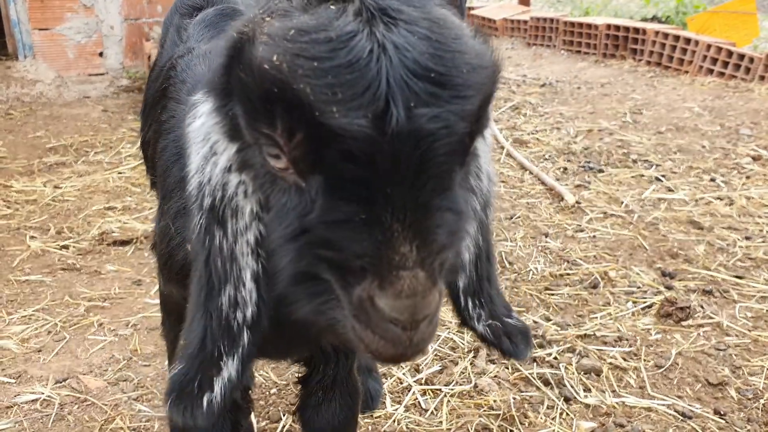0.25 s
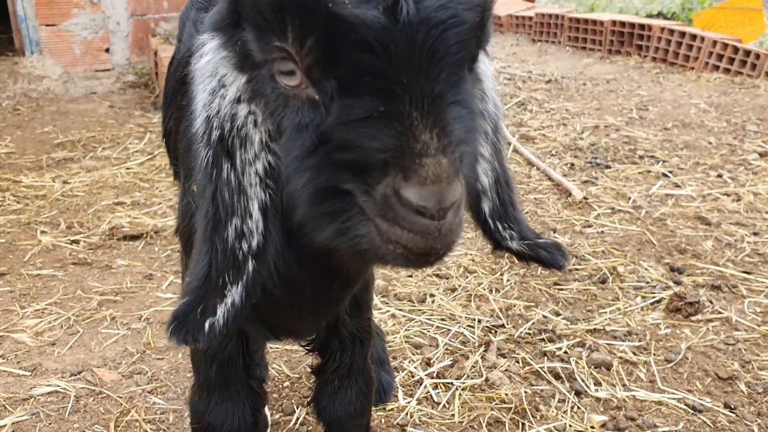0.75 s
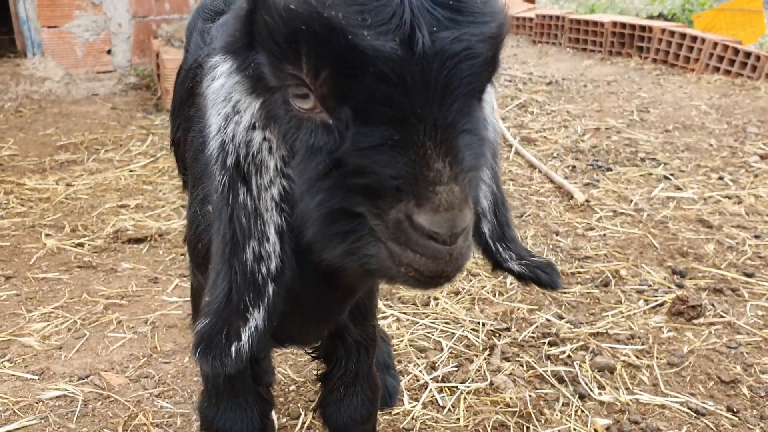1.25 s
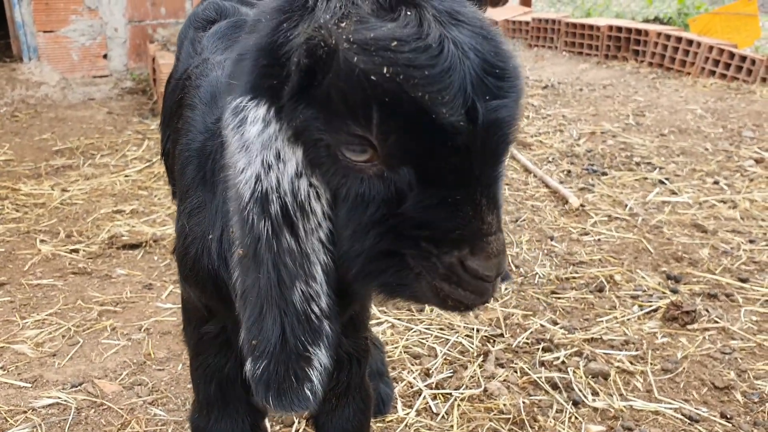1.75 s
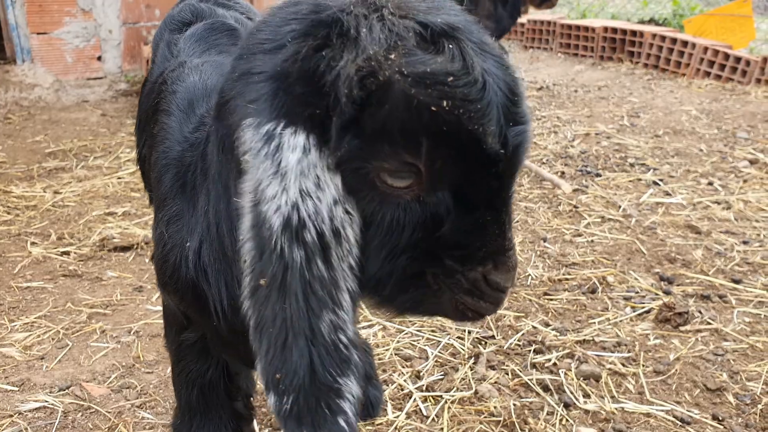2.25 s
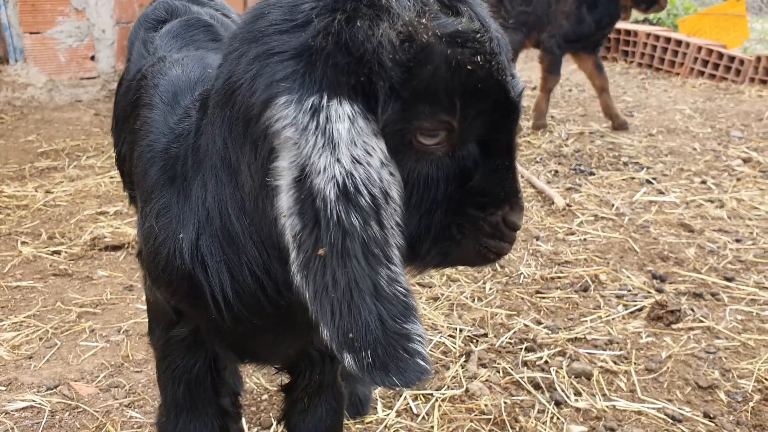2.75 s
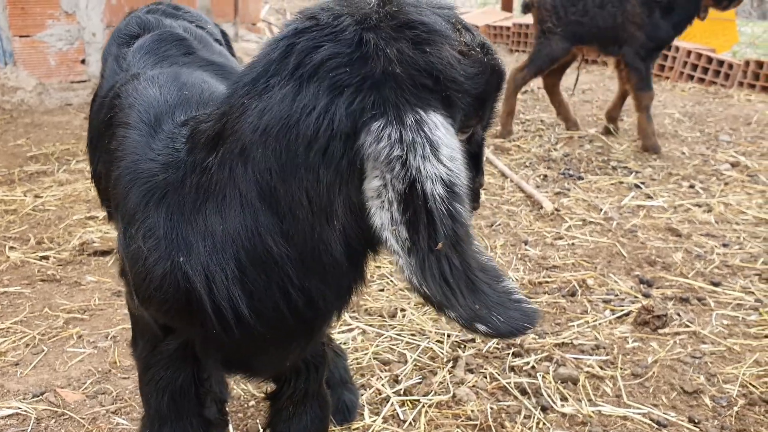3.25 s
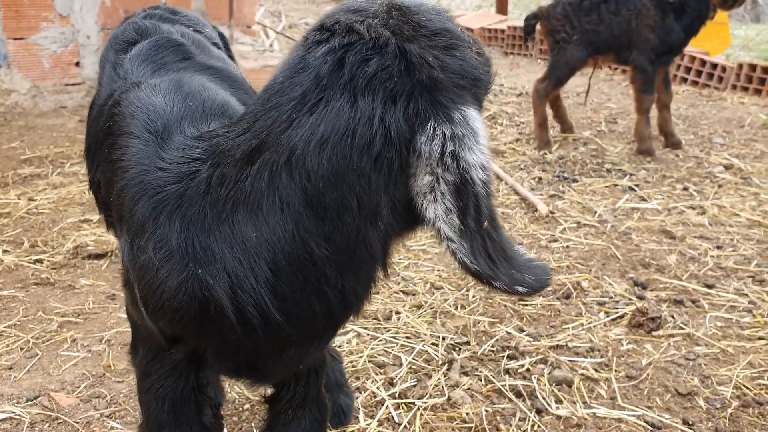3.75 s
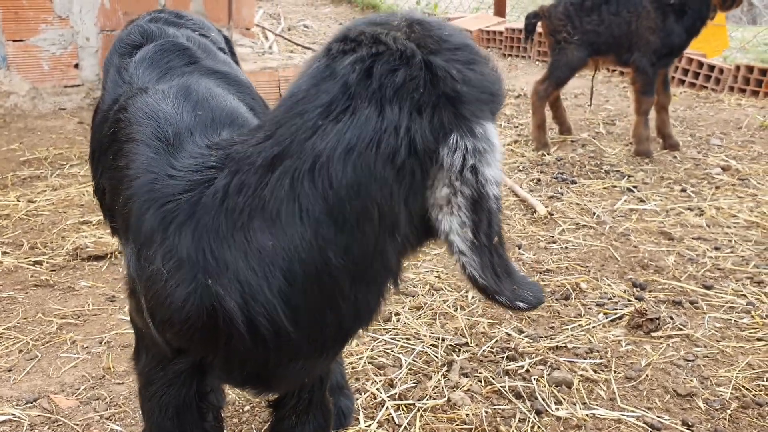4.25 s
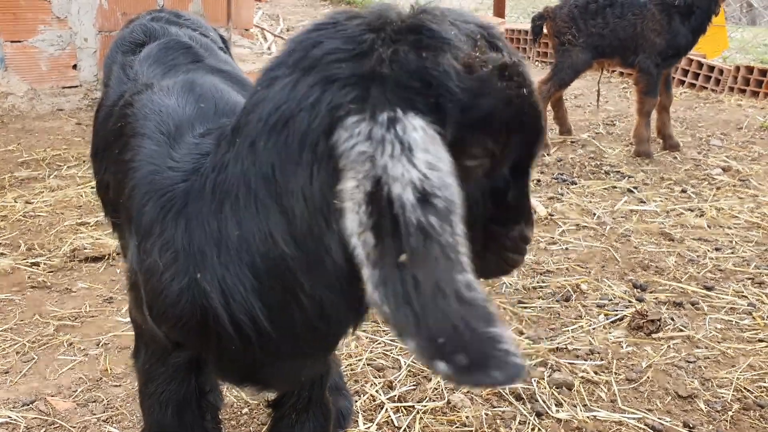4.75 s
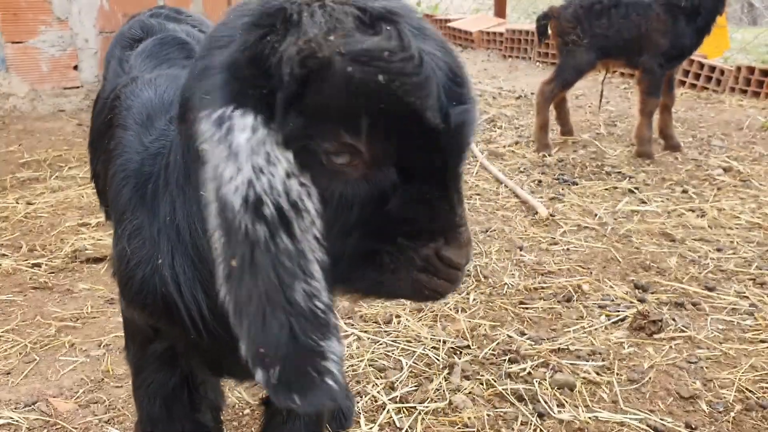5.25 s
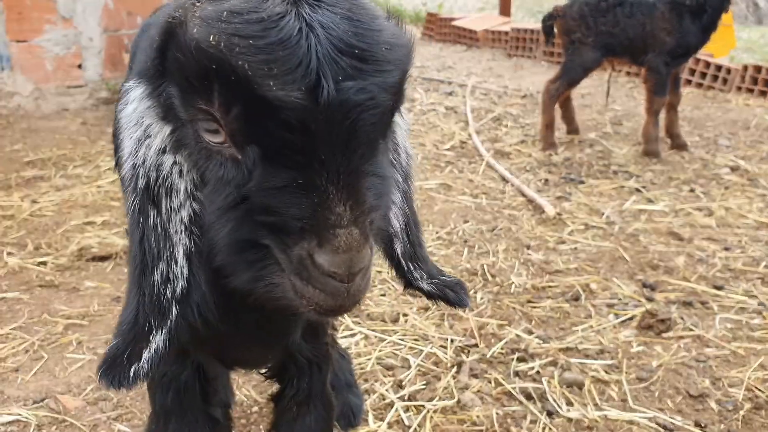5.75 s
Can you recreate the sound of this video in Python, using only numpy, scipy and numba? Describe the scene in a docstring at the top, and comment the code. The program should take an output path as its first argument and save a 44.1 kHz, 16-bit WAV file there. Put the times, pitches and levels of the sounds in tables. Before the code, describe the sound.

Close nasal bleats from a goat kid, two hoof knocks on grit, rustling straw and low rumbling wind gusts in a quiet open yard.

```python
"""An open straw pen: close to a phone, a goat kid bleats three times, thin, quavering, mouth nearly shut.
The voice is a pulsed source filtered by throat and nose; two voiceless puffs end the second bleat.
Hooves knock, scuff and snap straw as decaying modes and noise bursts. Wind buffets two microphone ports
as coloured turbulence, tearing gusts and single thumping eddies.
A bird whistles faintly in gliding tones over a slowly settling farmyard hush of shaped noise."""
import sys
import numpy as np
from scipy import signal
from scipy.fft import rfft, irfft
from scipy.io import wavfile
from scipy.ndimage import uniform_filter1d
from numba import njit

SR = 44100
rng = np.random.default_rng(int(sys.argv[2]) if len(sys.argv) > 2 else 0)


def wav_out(sig):
    """Save sig, one row per channel (or a flat mono array), as 16-bit PCM at SR to the path in sys.argv[1]."""
    wavfile.write(sys.argv[1], SR, np.round(np.clip(np.atleast_2d(sig).T, -1, 1) * 32767).astype(np.int16))


N = 264864
T = np.arange(N) / SR  # time [s]

# bleats beneath their throbs: (time [s], pitch [Hz], level [dB], mouth opening [dB])
BLEAT_1 = [(.1, 340, -77, -12), (.15, 351, -58, -4), (.2, 372.4, -61.5, -3), (.25, 387, -58, -3.5),
           (.31, 376.7, -59, -1), (.345, 389.7, -58.5, 3), (.45, 385, -61.5, 4.5), (.49, 403.3, -59, 3.5),
           (.56, 410.5, -59, 3.5), (.615, 410, -55.5, 1), (.66, 410.2, -58, 2.5), (.77, 405.7, -56.5, 0),
           (0.801, 365, -60, -7), (.84, 340, -67, -1), (.885, 337, -85, -7.5)]
BLEAT_2 = [(3.068, 337.6, -81, 4), (3.11, 351.6, -65.5, 0), (3.161, 359.2, -68.5, -3),
           (3.205, 382.6, -67.5, -1.5), (3.245, 386, -60.5, -9), (3.301, 381.2, -67.5, -1.5),
           (3.335, 379.8, -63, -6.5), (3.357, 354, -67, -2), (3.389, 367, -66, -4),
           (3.431, 370.7, -60, -5.5), (3.49, 382.5, -59.5, -2.5), (3.6, 348, -83, -11)]
BLEAT_3 = [(5.575, 329, -74, -4), (5.605, 327.2, -58, 1), (5.63, 317.5, -58.5, -2.5),
           (5.655, 303.2, -63, -5), (5.684, 359.7, -71, 2), (5.725, 385, -61.5, 5),
           (5.775, 396.6, -55, -2.5), (5.82, 382, -55, -4.5), (5.871, 377.8, -55, -5.5),
           (5.914, 387, -56.5, 3), (5.955, 396, -56, -2.5), (6.01, 389, -55.5, -5)]
# throat and nose spectrum of each bleat: (frequency [Hz], gain [dB])
THROAT_1 = [(250, -14), (410, 8.5), (820, -12), (1230, 0.5), (1620, -3.5), (2060, -11), (2450, -8),
            (2880, -2), (3300, -6), (3700, -9), (4150, -5), (4550, -7.5), (5050, 1), (5750, -8.5),
            (6500, -11.5), (7500, -12.5), (8500, 0), (9400, -13.5), (10200, -58)]
THROAT_2 = [(250, 21), (400, 12), (820, -7), (1260, 2.5), (1680, 5.5), (2100, -2.5), (2550, 4.5),
            (3200, -2), (3800, 3.5), (4200, 3), (4900, -6), (5900, -2.5), (7350, -4.5), (9100, -2),
            (10300, -27)]
THROAT_3 = [(250, 4), (410, 9.5), (820, -10.5), (1250, 0.5), (1650, -0.5), (2000, -11), (2350, -7),
            (3200, -9), (3800, 5.5), (4200, -3), (4600, -13), (5200, -3.5), (5900, -3), (7100, -15.5),
            (8100, -9.5), (9400, -17), (10200, -59)]
# highest resonance of each bleat, mouth shut, between throbs: (frequency [Hz], boost [dB])
NOSES = [(7020, 13), (7580, 6.5), (7196, 14)]
# level rise of each bleat under a push of full strength: (rise [dB])
QUAVERS = [5.5, 14.5, 3]


def kid():
    """Source-filter principle: three bleats, each with its own pitch contour and vocal-tract resonances."""
    contours = (BLEAT_1, BLEAT_2, BLEAT_3)
    throats = (THROAT_1, THROAT_2, THROAT_3)
    return sum(bleat(*call) for call in zip(contours, throats, NOSES, QUAVERS))


# pushes of the belly that make the quaver: (time [s], strength [0-1])
THROBS = [(0.159, 0.29), (.275, 0.47), (0.376, 0.58), (.473, 0.84), (0.576, 0.19), (0.62, 0.15),
          (0.711, 0.13), (0.766, 0.16), (3.114, 0.78), (3.217, 0.94), (3.306, 0.95), (3.39, .5),
          (5.604, 0.6), (5.73, 0.98), (5.821, 1), (5.913, 0.98), (6.0, 0.79)]
THROB_HALF_S, THROB_RISE_HZ = .023, 42.15  # half length of a push; pitch rise at full strength
# the voice is clearest when pressed and grows hoarse as it weakens
PRESSED_DB, CLEAR_ROUGH, ROUGH_PER_DB = -56, .3, .065
PORT_LAG_S = .00018  # the voice reaches the left port later
GROUND_DB = -5  # ground reflection, against the straight path


def bleat(contour, throat, nose, quaver_db, nose_width_hz=1000, widen_hz=1100, drop_hz=700,
          lead_s=0.0062, throat_pan_db=-1.0, nose_pan_db=6, wall_db=-15):
    """Modulated resonance: a throb lifts pitch and level, and lowers and broadens the high resonance."""
    hz, db, mouth_db = curves(contour)
    start, end = contour[0][0], contour[-1][0]
    push = sum(strength * bell(s, THROB_HALF_S) for s, strength in THROBS)
    hz = hz + THROB_RISE_HZ * push
    db = db + quaver_db * push
    rough = np.clip(CLEAR_ROUGH + ROUGH_PER_DB * np.maximum(PRESSED_DB - db, 0), 0, 1)
    voice = colour(larynx(hz, rough), throat) * undb(db) * (T > start) * (T < end)

    direct = np.array([np.interp(T - PORT_LAG_S, T, voice), voice])
    # the head hangs low, so the ground returns much of the voice
    ground = undb(GROUND_DB) * scatter(voice, decay_s=0.013)
    walls = undb(wall_db) * scatter(voice, decay_s=0.034)
    buzz = direct + ground + walls

    # the throat widens just ahead of the push, more for a strong one
    opening = np.interp(T + lead_s, T, push) * quaver_db / 10
    nose_hz, nose_db = nose
    centre = np.clip(nose_hz - drop_hz * opening, 20, SR / 3)
    width = nose_width_hz + widen_hz * opening
    whine = np.array([resonance(resonance(port, centre, width), centre, width) for port in buzz])
    mouth_sound = pan(throat_pan_db) * undb(mouth_db) * buzz
    nose_sound = pan(nose_pan_db) * undb(nose_db) * whine
    return mouth_sound + nose_sound


def larynx(hz, rough):
    """Vocal-fold oscillation: harmonic pulses, uneven with roughness, and air that escapes once a cycle."""
    jitter = .003 * walk(80) + .016 * rough * walk(400)
    phase = 2 * np.pi * np.cumsum(hz * (1 + jitter)) / SR
    folds = unit(sum(np.cos(k * phase) for k in np.arange(1, 29)))
    air = unit(rng.standard_normal(N) * (1 + np.cos(phase)))
    shimmer_db = 4 * rough * walk(200) + 1.5 * walk(70)
    return (folds + .8 * rough * air) * undb(shimmer_db) / np.sqrt(1 + rough ** 2 / 2)


# voiceless puffs ending the second bleat:
# (time [s], rise [s], decay [s], level [dB], left minus right [dB])
PUFFS = [(3.455, 0.027, 0.05, -50, -3), (3.553, 0.014, 0.046, -58, -3)]
# spectrum of the puffs: (frequency [Hz], level [dB])
PUFF_COLOUR = [(400, -28), (850, 6), (1050, 2.5), (1250, -10), (1800, 8.5), (2300, 4.5), (2700, -2),
               (3050, 4), (3420, 8), (3700, -3), (4200, -4), (4520, -5), (5100, -13), (9000, -14),
               (10500, -36)]


def snort():
    """Turbulent jet noise: air forced through the nose without voice."""
    return bursts(PUFFS, PUFF_COLOUR, grain_db=1.0)


# hooves knocking on grit: (time [s], level [dB], pitch [ratio], left minus right [dB])
KNOCKS = [(2.1769, -37, 0.966, -3), (2.583, -46, 1.12, -14)]
# modes of a knock at pitch ratio 1: (frequency [Hz], level [dB], 60 dB decay [s])
KNOCK_MODES = [(1140, -13, 0.014), (1310, -5, 0.016), (1820, -8, 0.014), (2765, -3, 0.021),
               (2980, -9, 0.018), (3500, -24, 0.0071), (7100, -17.5, 0.0055)]
# grit cracking under a hoof: (time [s], level [dB], pitch [ratio], left minus right [dB])
CRACKS = [(2.1665, -49, 1.8, 1), (2.1915, -54, 0.86, -5), (5.2454, -54, 1.3, -3), (5.2494, -44.5, 1.05, 1),
          (5.2525, -44.5, 0.94, -1), (5.2577, -51, 0.92, -4)]
# modes of a crack at pitch ratio 1: (frequency [Hz], level [dB], 60 dB decay [s])
CRACK_MODES = [(620, -11, .008), (2080, -4, 0.0062), (3020, 1.5, 0.005), (3870, -9, 0.0052),
               (5000, -9, .003)]
# hooves scuffing the strawy ground:
# (time [s], rise [s], decay [s], level [dB], left minus right [dB])
SCUFFS = [(.365, 0.0058, 0.017, -62, 4), (2.15, .003, 0.038, -60, -4), (2.495, .004, 0.032, -66.5, -4),
          (2.632, 0.002, 0.0061, -58, -3), (5.88, 0.0093, .01, -66, 2), (5.915, 0.017, .022, -62.5, 1)]
# spectrum of the scuffs: (frequency [Hz], level [dB])
SCUFF_COLOUR = [(500, -24), (950, -3.5), (1220, 9), (1520, -6.5), (1790, 0.5), (1980, -24), (2220, 14),
                (2420, -3), (2680, 6.5), (3000, 0), (3500, 8), (4300, -5), (7500, -15), (10000, -50)]
# dry stalks snapping: (time [s], rise [s], decay [s], level [dB], left minus right [dB])
STALKS = [(.798, 0.00093, 0.006, -58.5, -22), (2.521, 0.0096, 0.02, -59.5, -.5),
          (3.513, 0.0019, .0084, -60, -3)]
# spectrum of the snaps: (frequency [Hz], level [dB])
STALK_COLOUR = [(1000, -29), (3000, 10), (7000, 2), (9500, 0), (15000, -4)]


def hooves():
    """Impact and friction: hard contacts excite modes, crushed straw makes bursts of noise."""
    knocks = clicks(KNOCKS, KNOCK_MODES, contact_s=.00022)
    cracks = clicks(CRACKS, CRACK_MODES, contact_s=0.00017)
    hard = knocks + cracks
    reflected = undb(-2) * scatter(hard.mean(axis=0), decay_s=0.013)
    scuffs = bursts(SCUFFS, SCUFF_COLOUR, grain_db=1.5)
    snaps = bursts(STALKS, STALK_COLOUR, grain_db=-1.0)
    return hard + reflected + scuffs + snaps


def clicks(table, modes, contact_s):
    """Modal synthesis: each hard contact is a sum of briefly ringing, exponentially damped sines."""
    out, t = np.zeros((2, N)), T[:SR // 20]
    onset = 1 - np.exp(-(t / contact_s) ** 2)
    for s, db, pitch, pan_db in table:
        ring = sum(undb(mode_db - 60 * t / t60) * np.sin(2 * np.pi * hz * pitch * t)
                   for hz, mode_db, t60 in modes)
        first = int(s * SR)
        out[:, first:first + len(t)] += undb(db) * pan(pan_db) * ring * onset
    return out


def bursts(table, points, grain_db):
    """Enveloped noise: quick swells of grainy noise that decay exponentially."""
    swell = 0
    for s, rise, decay, db, pan_db in table:
        envelope = np.where(T < s, bell(s, rise), np.exp(-np.abs(T - s) / decay))
        swell = swell + undb(db) * pan(pan_db) * envelope
    grains = unit(noise(points, likeness=0.034) * undb(grain_db * walk(900)))
    return swell * grains


# gusts on the ports: (arrival [s], rise [s], hold [s], level [dB],
# small eddies against large [dB], left minus right [dB])
GUSTS = [(0.104, 0.036, .015, -40, -14, 3), (0.46, 0.08, 0.025, -38.5, -12, 6),
         (0.6, 0.036, 0.2, -29.5, -15, -3), (0.843, 0.022, 0.36, -29, -9, -4),
         (1.22, 0.029, 0.18, -33, 3.5, 1.5), (1.535, 0.11, 0.087, -24, -12, -1),
         (1.632, 0.028, 0.44, -28, -10.5, -1), (2.098, 0.046, 0.43, -29.5, -14.5, -7),
         (2.655, 0.041, 0.24, -28.5, -7.5, -0.5), (3.8, 0.042, 0.018, -27, -18.5, -3.5),
         (4.192, 0.072, 0.055, -28, -16, 10.5), (4.297, 0.014, 0.039, -21.5, -14.5, 3.5),
         (4.436, 0.18, 0.079, -34, -20.5, 2), (4.92, 0.024, 0.27, -34, -19, 0.5),
         (5.122, 0.0088, 0.16, -26.5, -17.5, -7), (5.381, 0.018, 0.023, -30.5, 1.5, -7.5),
         (5.431, 0.051, 0.074, -28, -31, -3), (5.728, 0.03, 0.02, -30.5, -19, -1),
         (5.875, 0.0059, 0.0057, -37, -36, 28)]
# spectrum of the large eddies: (frequency [Hz], level [dB])
LARGE_EDDIES = [(12, -15.5), (26, -9), (54, 4.5), (80, 4.5), (191, -16.5), (400, -58.5), (520, -47),
                (880, -120)]
# spectrum of the small eddies: (frequency [Hz], level [dB])
SMALL_EDDIES = [(90, -4), (170, 13.5), (240, 8), (350, 1), (500, -22), (700, -23.5), (1200, -50.5),
                (2500, -62.5), (6000, -65.5)]
BREEZE_DB, BREEZE_SMALL_DB = -53, -58  # light breeze beneath the gusts: large and small eddies


def wind(flutter_db=4, buffets_per_s=10, buffet_db=3, sway_db=3.0):
    """Turbulence at two scales: large eddies rumble under each gust and small ones flutter on top."""
    large, small = undb(BREEZE_DB) ** 2, undb(BREEZE_SMALL_DB) ** 2
    for s, rise, hold, db, fine_db, side_db in GUSTS:
        power = (gust(s, rise, hold) * undb(db) * pan(side_db)) ** 2
        large = large + power
        small = small + power * undb(fine_db) ** 2
    rumble = eddies(LARGE_EDDIES, evenness=0.4, span_s=0.038, likeness=0.26) * np.sqrt(large)
    fine = eddies(SMALL_EDDIES, evenness=0.89, span_s=0.054, likeness=-0.15)
    flutter = unit(fine * undb(flutter_db * walk(70))) * np.sqrt(small)
    # the flow arrives in uneven buffets and swings from port to port
    shedding = 2 * np.pi * np.cumsum(buffets_per_s * (1 + 0.4232 * walk(13))) / SR
    buffets = unit(undb(buffet_db * np.sin(shedding)))
    return (rumble + flutter) * buffets * pan(sway_db * walk(18))


def gust(s, rise, hold, fall_s=0.032):
    """Exponential build-up and decay: a gust grows until time s, holds, and every one dies away alike."""
    return np.exp(-np.maximum(s - T, 0) / rise - np.maximum(T - s - hold, 0) / fall_s)


def eddies(points, evenness, span_s, likeness):
    """Turbulent pressure at each port: coloured noise, its strength partly evened out over span_s."""
    x = noise(points, likeness)
    strength = uniform_filter1d(x ** 2, max(int(span_s * SR), 2), axis=1) + 1e-6
    return unit(x / strength ** (np.clip(evenness, 0, 1) / 2))


# fast gusts tearing across the ports: (time [s], half length [s], rush [dB], crackle [dB])
TEARS = [(1.053, 0.0045, -48, -43), (1.099, .004, -42, -52), (1.119, 0.017, -46, -44.5),
         (1.156, 0.0061, -25, -39), (1.175, 0.02, -28, -39.5), (1.224, 0.0059, -24.5, -44),
         (1.242, 0.012, -24, -65), (1.279, 0.017, -36, -68), (1.316, 0.021, -36.5, -73),
         (1.343, 0.0087, -21, -39), (1.369, 0.01, -25, -38.5), (1.376, 0.0053, -28.5, -43),
         (1.393, 0.0077, -40.5, -58), (1.431, 0.0034, -36, -51.5), (1.551, 0.0083, -48, -54.5),
         (1.698, 0.0025, -32.5, -60), (1.897, .005, -46, -52), (2.63, 0.0042, -42, -65),
         (2.712, 0.0033, -53, -44.5), (2.852, 0.017, -42.5, -72), (5.267, 0.0053, -50, -55),
         (5.314, 0.0028, -43.5, -60), (5.361, 0.0034, -39.5, -67), (5.402, 0.0061, -38.5, -63)]
# spectrum of the rush: (frequency [Hz], level [dB])
TEAR_COLOUR = [(120, -9), (250, 6.5), (410, 6), (620, -3.5), (800, -25), (1200, -36), (2500, -57)]
# spectrum of the gritty crackle: (frequency [Hz], level [dB])
CRACKLE_COLOUR = [(480, 5.5), (720, 5.5), (1100, -1), (1500, -17.5), (2200, -28), (3500, -39.5),
                  (8000, -46.5)]


def tearing(grain_db=4):
    """Fine-scale turbulence: the fastest gusts reach the midrange, the sharpest with a gritty crackle."""
    rush = sum(bell(s, half) * undb(db) for s, half, db, _ in TEARS)
    grit = sum(bell(s, half) * undb(db) for s, half, _, db in TEARS)
    body = eddies(TEAR_COLOUR, evenness=0.92, span_s=0.0099, likeness=-0.53)
    fine = eddies(CRACKLE_COLOUR, evenness=1.0, span_s=0.021, likeness=-0.48)
    crackle = unit(fine * undb(grain_db * walk(600)))
    return rush * body + grit * crackle


# hardest single eddies, before a common gain:
# (time [s], relative level [dB], pitch [Hz], left minus right [dB])
THUMPS = [(0.831, -18, 82, 10), (0.85, -19, 206, 3), (0.955, -12.5, 79.6, -16), (1.031, -18.5, 70.4, 8),
          (1.065, -14, 89, -12), (1.124, -15, 69.4, -0.5), (1.153, -21.5, 533, -13), (1.179, -23, 577, 10),
          (1.18, -12, 128, 8), (1.245, -15.5, 192, 14), (1.306, -18.5, 86, -6.5), (1.366, -21, 480, 1),
          (1.379, -21, 496, 17), (1.435, -15, 98.5, 14), (1.511, -17, 78.5, 5), (1.546, -8.5, 84, -11),
          (1.575, -14, 69.4, -6), (1.624, -11, 140, -14), (1.765, -17.5, 74.5, 8), (1.895, -15, 109, -8),
          (1.948, -20.5, 172, 0), (1.989, -18, 153, 6), (2.131, -15, 78.8, -0.5), (2.283, -17.5, 76, 0),
          (2.367, -15.5, 107, 0), (2.494, -19.5, 83, -4.5), (2.664, -13, 157, -11),
          (2.681, -16.5, 86.4, -7), (2.714, -12, 87.5, -27), (2.763, -20, 132, 1), (2.802, -20.5, 190, 8),
          (2.818, -11, 88, 16), (2.866, -13.5, 123, 10.5), (3.812, -18, 76.6, -37),
          (4.178, -28, 76.5, 13.5), (4.302, -13.5, 114, 11.5), (4.328, -14.5, 67.6, 0),
          (5.158, -11, 72, 10), (5.406, -12.5, 121, -25), (5.74, -13.5, 58.4, 8)]


def thumps(gain_db=-2, rise_cycles=0.45, fall_cycles=1.0, breakup_db=-29, breakup_s=0.0039,
           lead_cycles=0.8, crackle_db=-16):
    """Pressure pulse: an eddy strikes with a brief rough flutter, then pushes and pulls for a cycle or two."""
    out = np.zeros((2, N))
    flutter = eddies(TEAR_COLOUR, evenness=0.89, span_s=0.01, likeness=-0.91)
    flutter = flutter + undb(crackle_db) * noise(CRACKLE_COLOUR)
    start_turns = rng.random((len(THUMPS), 2, 1))  # random phase at each port
    for (s, db, hz, pan_db), turns in zip(THUMPS, start_turns):
        near = slice(max(int(s * SR) - SR // 12, 0), int(s * SR) + SR // 12)
        t = T[near] - s
        envelope = np.exp(-(t * hz / np.where(t < 0, rise_cycles, fall_cycles)) ** 2)
        swing = undb(gain_db) * envelope * np.sin(2 * np.pi * (t * hz + turns))
        # the flutter begins ahead of the thump and peaks after half of breakup_s
        age = np.maximum(t + lead_cycles / hz, 0) * 2 / breakup_s
        breakup = undb(breakup_db) * age * np.exp(1 - age) * flutter[:, near]
        out[:, near] += undb(db) * (pan(pan_db) * swing + breakup)
    return out


# bird whistles before their waver: (time [s], length [s], start pitch [Hz], middle pitch [Hz],
# end pitch [Hz], level [dB], waver [share of the pitch])
WHISTLES = [(0.995, .19, 1700, 1925, 2040, -71.5, 0.038), (1.414, 0.077, 1965, 2030, 1970, -72, .007),
            (2.66, .46, 2150, 2175, 2140, -78, 0.0244)]


def bird(pan_db=-4):
    """Frequency modulation: distant, nearly pure tones glide along a parabola with a random waver."""
    out = np.zeros(N)
    for s, length, first_hz, middle_hz, last_hz, db, waver in WHISTLES:
        along = np.clip((T - s) / length, 0, 1)
        glide = np.polyfit([0, .5, 1], [first_hz, middle_hz, last_hz], 2)
        hz = np.polyval(glide, along) * (1 + waver * walk(350))
        envelope = np.sqrt(np.abs(np.sin(np.pi * along)))
        out += undb(db) * np.sqrt(2) * envelope * np.sin(2 * np.pi * np.cumsum(hz) / SR)
    return out * pan(pan_db)


# spectrum of the hush: (frequency [Hz], level [dB])
YARD_COLOUR = [(30, 4.5), (65, 8.5), (120, -15), (220, -7.5), (400, -11), (700, -18.5), (1100, -25.5),
               (1500, -29.5), (2000, -28.5), (3500, -30.5), (4600, -39.5), (7300, -37.5), (8400, -51),
               (15500, -45.5)]
# the hush slowly settles, beneath its swells: (time [s], level [dB])
YARD_LEVEL = [(0, -42.5), (1, -48.5), (2.5, -48), (3.6, -49.5), (4.7, -50.5), (6, -50.5)]


def yard(swell_db=2.02, flicker_db=.5):
    """Diffuse ambient noise: the open-air hush, swelling a little."""
    db, = curves(YARD_LEVEL)
    hush = noise(YARD_COLOUR, likeness=-0.16)
    level_db = db + swell_db * walk(0.95) + flicker_db * walk(16)
    return hush * undb(level_db)


def scatter(x, decay_s):
    """Diffuse reflection: convolution with decaying noise for the pen, different at each port."""
    t = T[:SR // 4]
    echoes = rng.standard_normal((2, len(t))) * np.exp(-t / decay_s)
    echoes = echoes / np.sqrt(np.sum(echoes ** 2) / 2)
    return signal.fftconvolve(x[None], echoes, axes=1)[:, :N]


@njit
def resonance(x, hz, width):
    """Resonance: a state-variable band-pass with a moving centre, gain 1 there."""
    y, band, low = np.empty(len(x)), 0., 0.
    for i in range(len(x)):
        g, k = np.tan(np.pi * hz[i] / SR), width[i] / hz[i]
        v = (band + g * (x[i] - low)) / (1 + g * (g + k))
        band = 2 * v - band
        low = low + 2 * g * v
        y[i] = k * v
    return y


def colour(x, points):
    """Spectral shaping: filter by (frequency [Hz], gain [dB]) points, closed steeply at both ends."""
    hz, db = np.transpose(points)
    f = np.maximum(np.arange(N // 2 + 1) * SR / N, 1)
    octaves_outside = np.abs(np.log2(f / np.clip(f, hz[0], hz[-1])))
    gain_db = np.interp(np.log(f), np.log(hz), db) - 18 * octaves_outside
    return irfft(rfft(x) * undb(gain_db), N)


def noise(points, likeness=0):
    """Partial correlation: port noises from opposed (likeness -1) through unrelated (0) to alike (1)."""
    mid, side = colour(rng.standard_normal((2, N)), points)
    c = np.clip(likeness, -1, 1)
    return unit(np.sqrt(1 + c) * mid + np.sqrt(1 - c) * side * np.array([[1], [-1]]))


def walk(rate):
    """Random modulation: smooth chance that changes rate times a second; spread 1."""
    return unit(np.interp(T * rate, np.arange(N // 8), rng.standard_normal(N // 8)))


def bell(s, half):
    """Gaussian envelope: a smooth swell around time s."""
    return np.exp(-np.minimum(((T - s) / half) ** 2, 50))


def curves(table):
    """Linear interpolation: the columns of a table of timed rows, sample by sample."""
    s, *columns = np.transpose(table)
    return [np.interp(T, s, c) for c in columns]


def pan(db):
    """Level-difference stereo: left and right gains of equal total power."""
    gains = undb(np.array([[.5], [-.5]]) * db)
    return gains / np.sqrt(np.mean(gains ** 2, axis=0))


def undb(db):
    """Logarithmic level: decibels to amplitude gain."""
    return 10 ** (np.asarray(db) / 20)


def unit(x):
    """Root-mean-square normalization: scale to rms 1."""
    return x / np.sqrt(np.mean(x ** 2) + 1e-20)


def scene():
    """Superposition: the kid, its hooves, the wind, the bird and the yard add linearly."""
    animal = kid() + snort() + hooves()
    air = wind() + tearing() + thumps()
    return animal + air + bird() + yard()


def record(dry):
    """Band limiting: the phone cuts the top with a steep elliptic low-pass."""
    cut_hz = 15500
    # order 8, ripple 0.2 dB, stop-band 70 dB down
    return signal.sosfilt(signal.ellip(8, .2, 70, cut_hz, fs=SR, output="sos"), dry)


dry = scene()
out = record(dry)
wav_out(out)
```